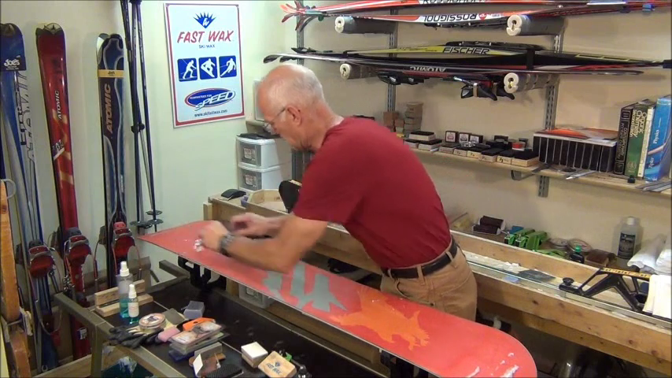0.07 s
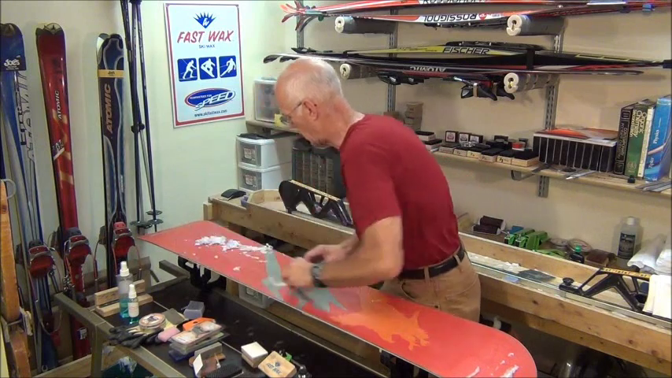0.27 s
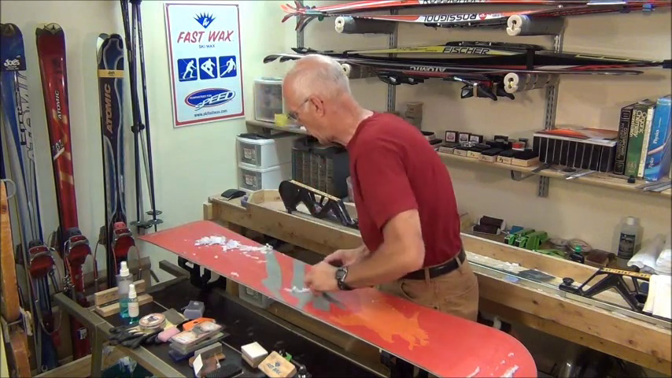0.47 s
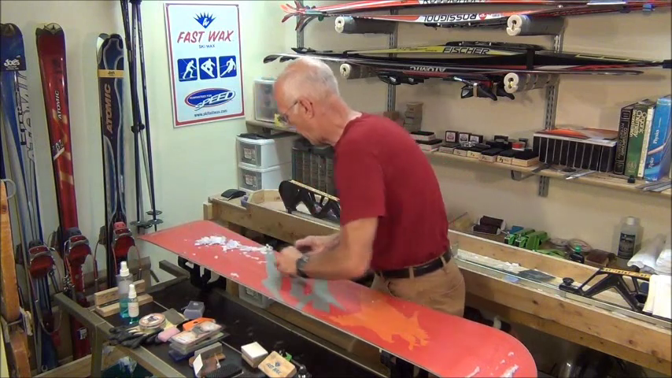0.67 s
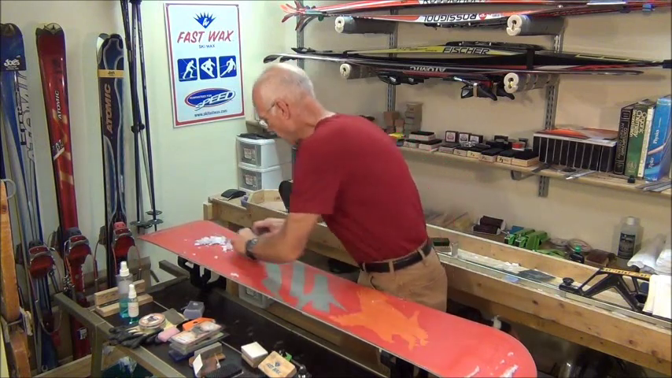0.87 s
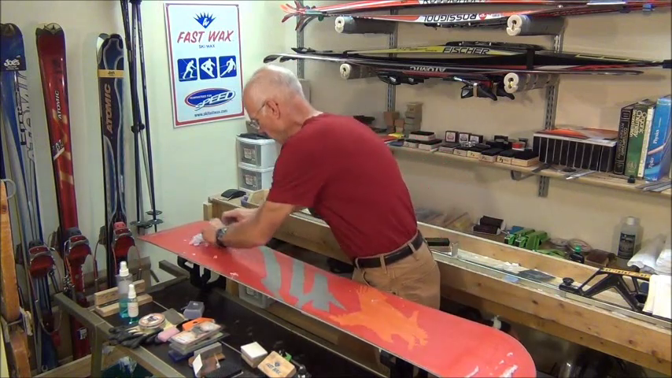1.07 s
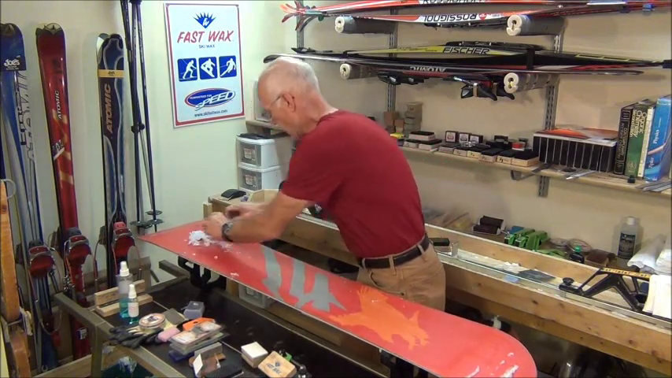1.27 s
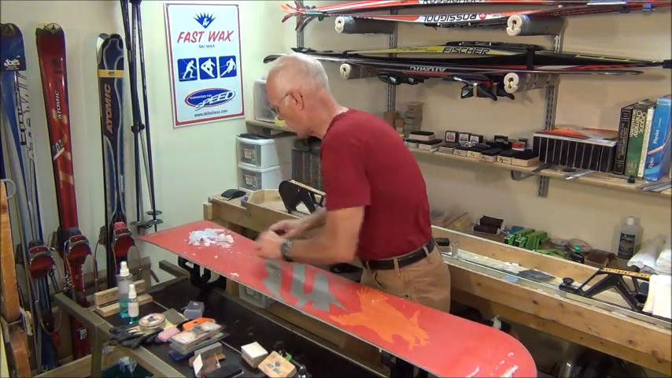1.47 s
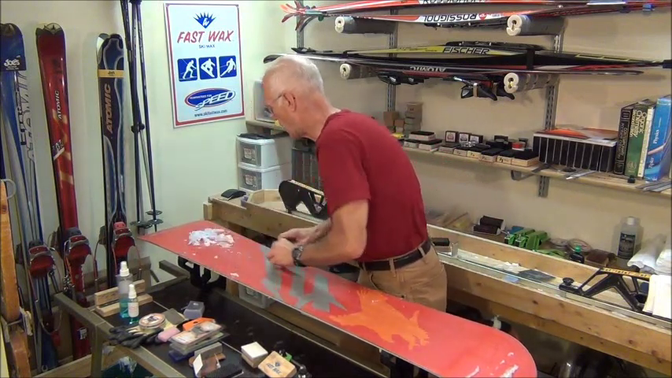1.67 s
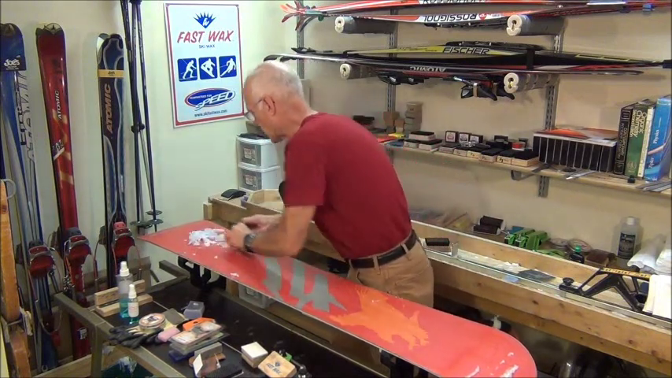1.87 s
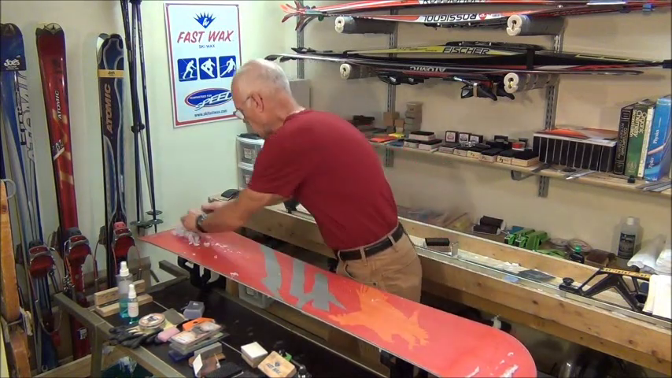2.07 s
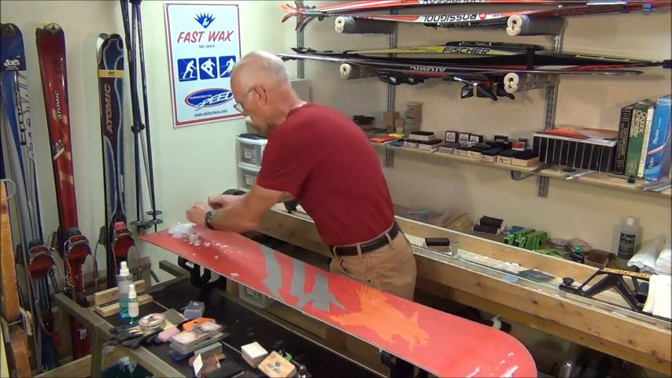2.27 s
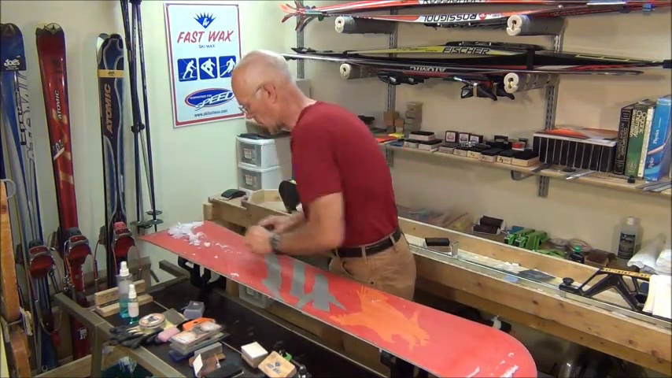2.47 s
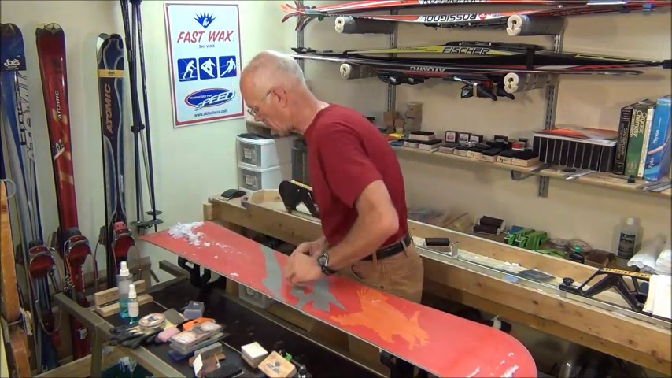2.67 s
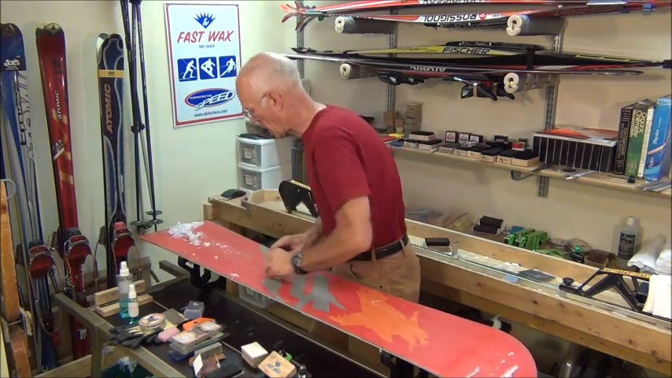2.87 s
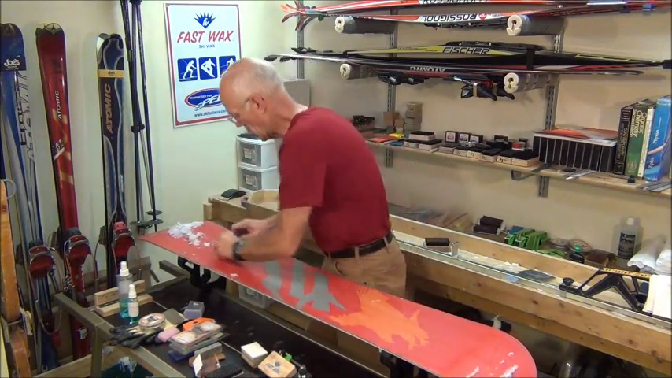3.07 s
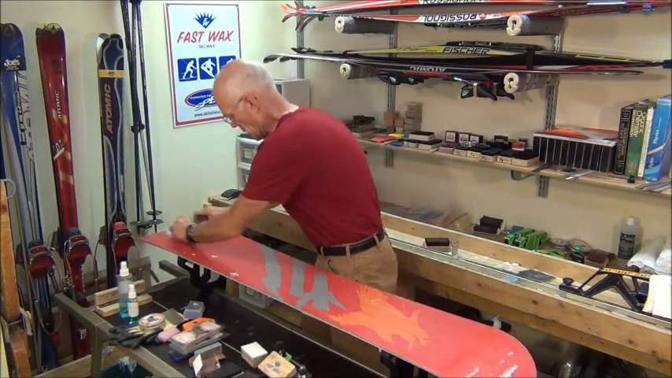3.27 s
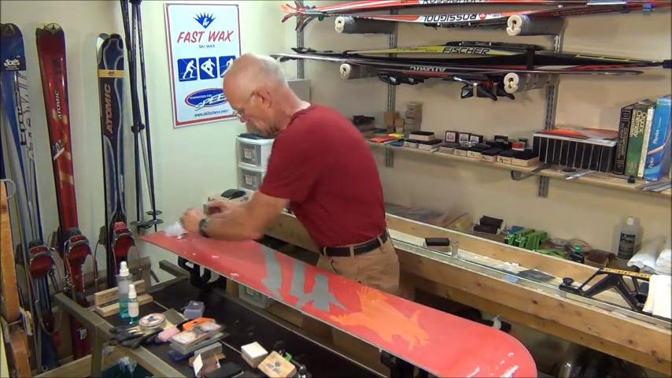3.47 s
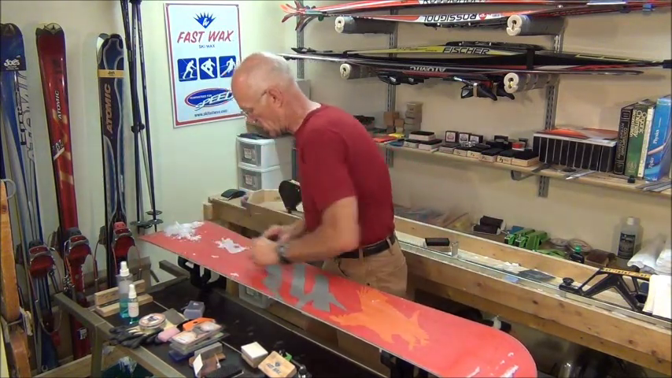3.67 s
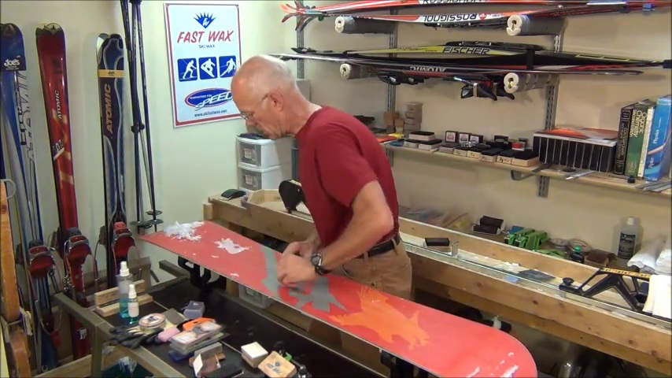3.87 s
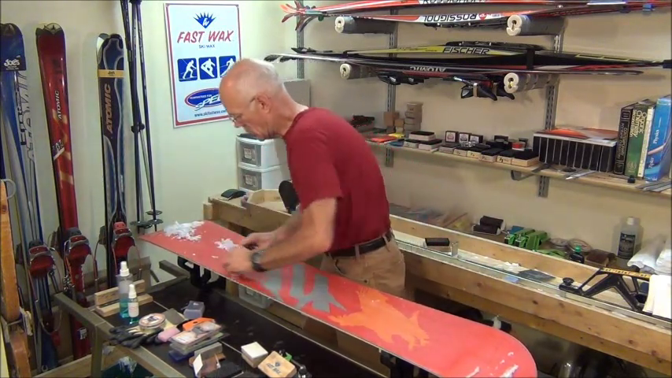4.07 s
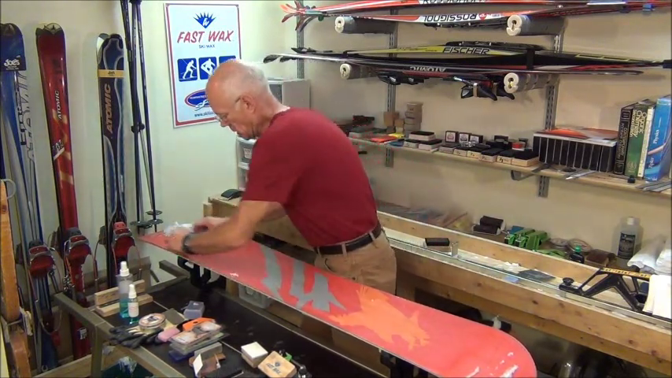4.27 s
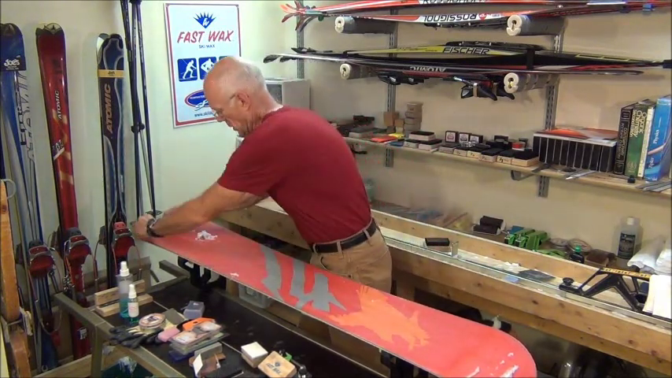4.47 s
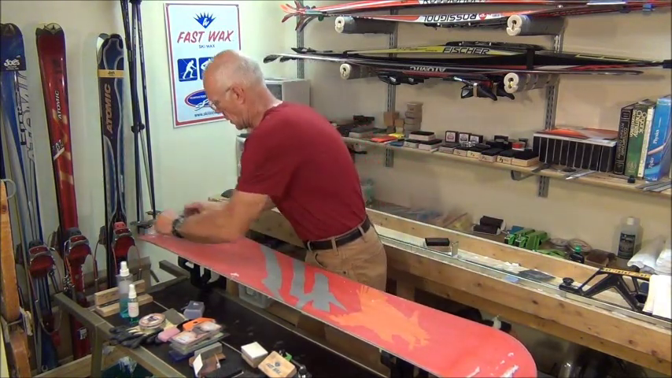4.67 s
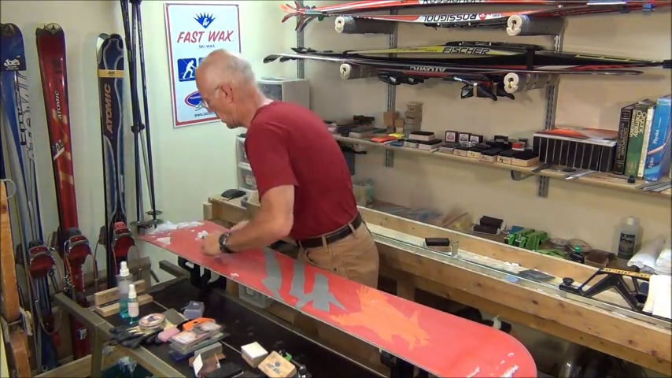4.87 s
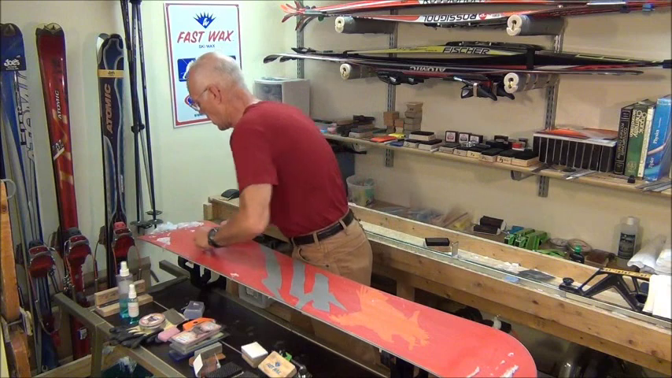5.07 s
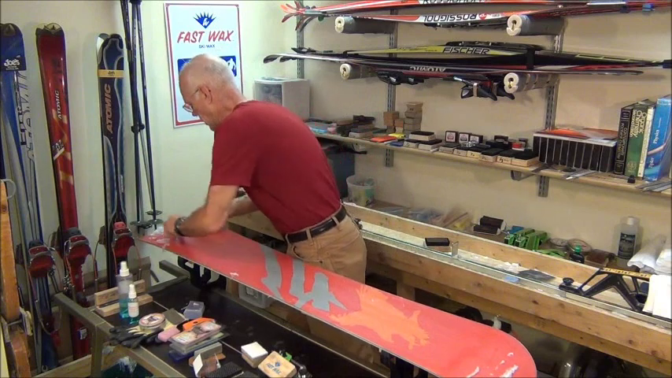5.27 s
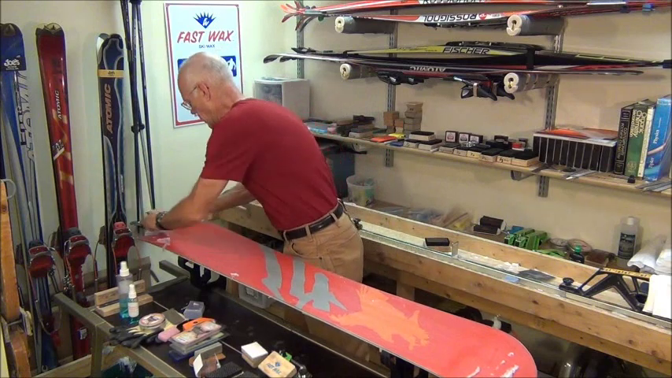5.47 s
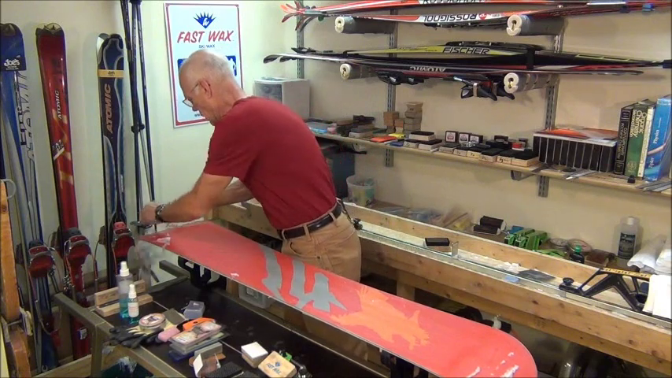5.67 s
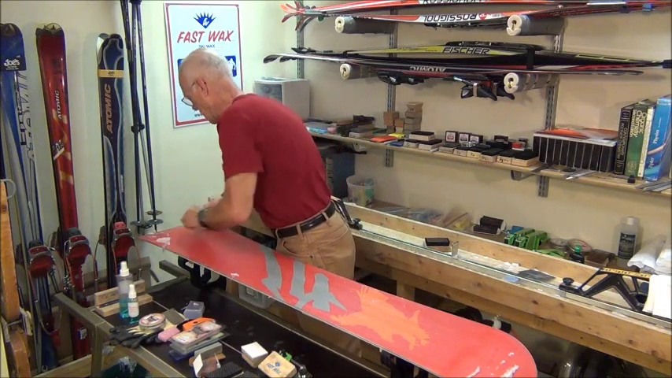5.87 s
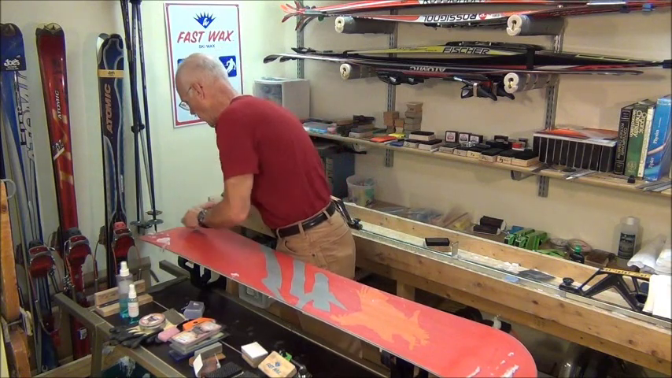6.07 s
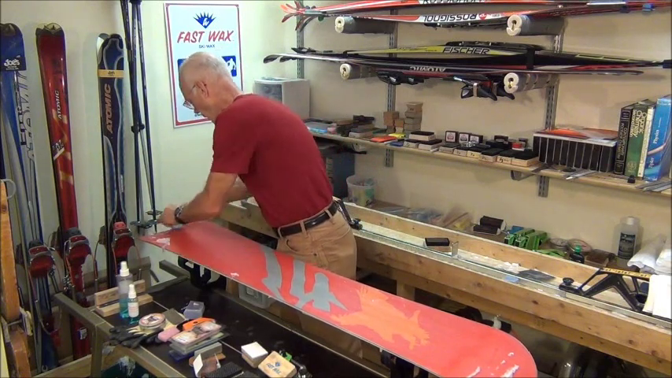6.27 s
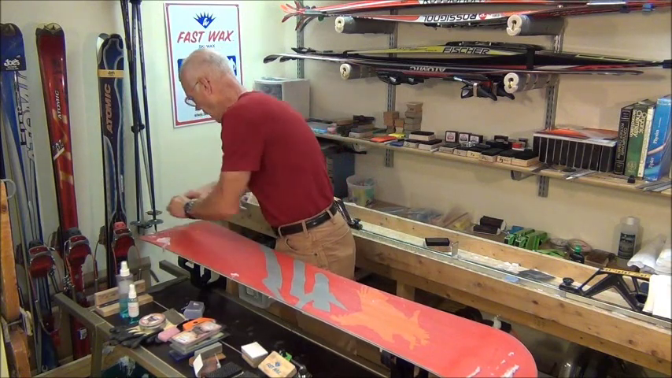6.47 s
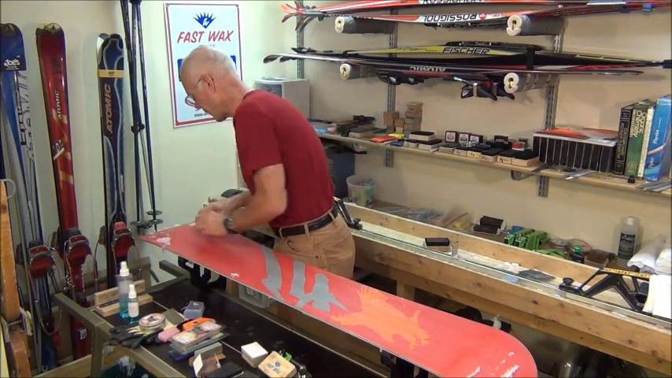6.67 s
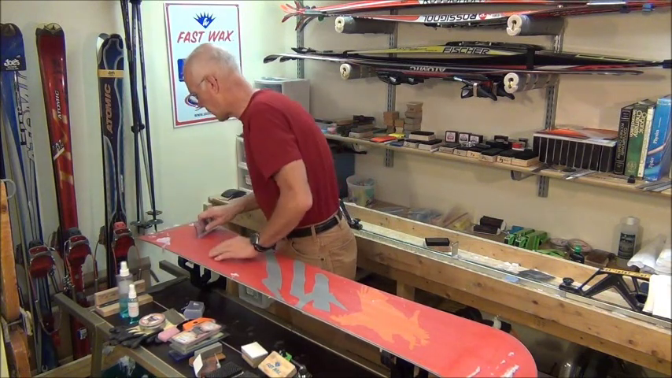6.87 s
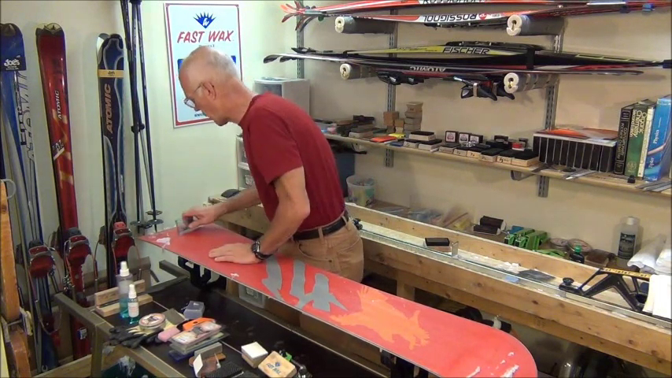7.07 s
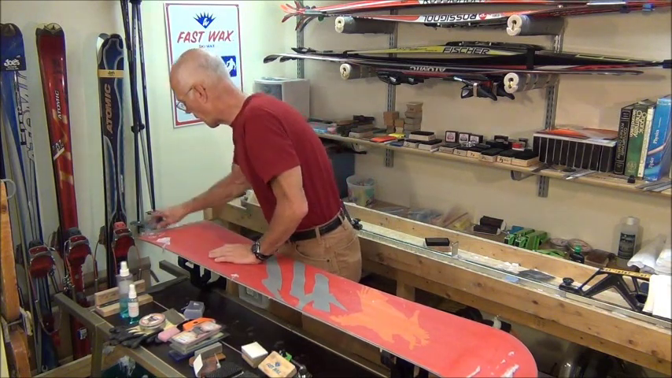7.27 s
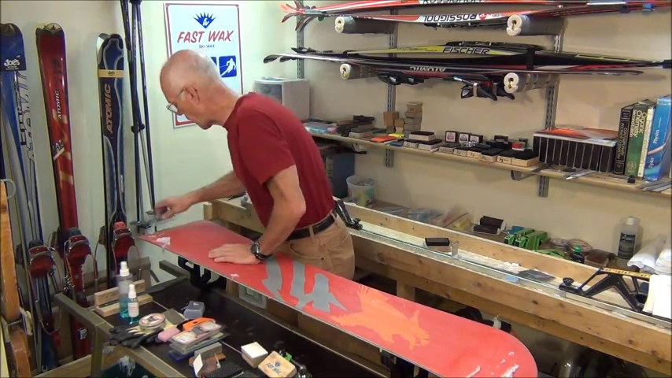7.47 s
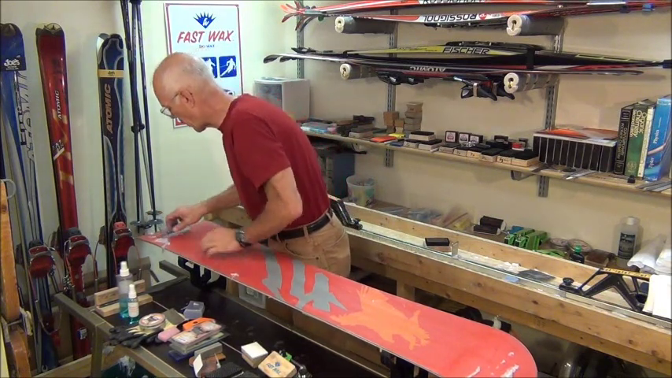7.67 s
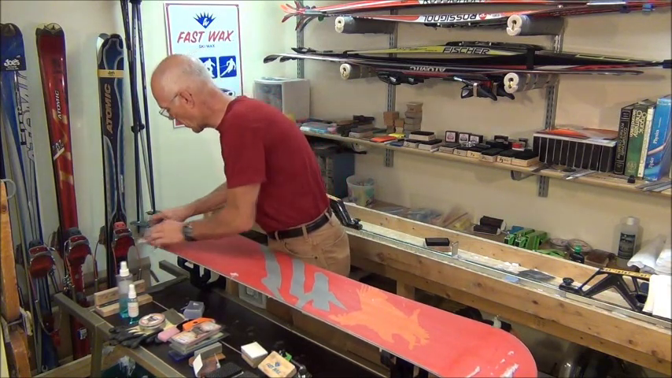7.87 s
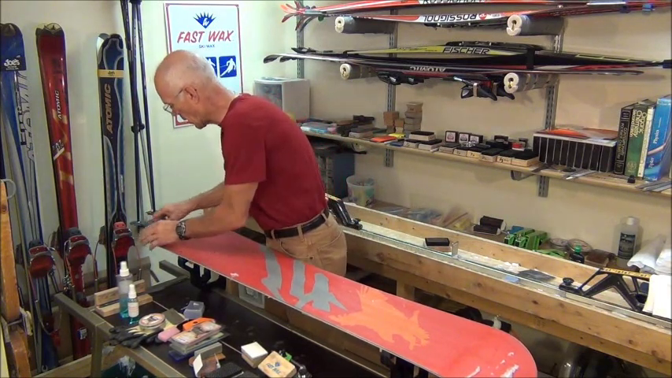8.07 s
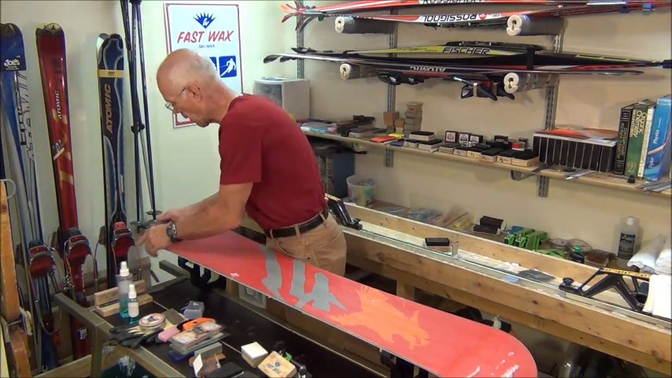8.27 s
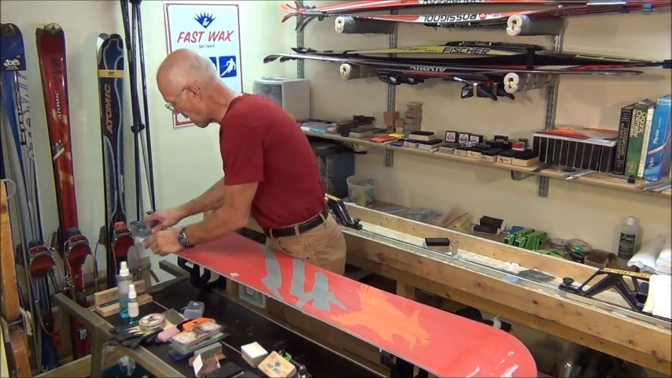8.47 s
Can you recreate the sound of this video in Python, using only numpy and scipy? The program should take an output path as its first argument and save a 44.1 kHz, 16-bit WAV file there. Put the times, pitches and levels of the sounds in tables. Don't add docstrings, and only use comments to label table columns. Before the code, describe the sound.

Close, bright rasping of a hard edge on a waxed board: regular half-second pulls separated by near-quiet gaps with small taps, soft thuds and a brittle wax click. After five pulls the blade bounces woodenly off the end, then brief scrapes and firm knocks come irregularly. The board twangs low; a faint steady hum and tight workshop walls surround it.

```python
import sys
import numpy as np
from scipy import signal
from scipy.fft import rfft, irfft, next_fast_len
from scipy.io import wavfile
from scipy.ndimage import uniform_filter1d

SR = 44100
rng = np.random.default_rng(int(sys.argv[2]) if len(sys.argv) > 2 else 0)


def output_pcm(signal):
    pcm = np.clip(np.atleast_2d(signal).T, -1, 1) * 32767
    wavfile.write(sys.argv[1], SR, np.round(pcm).astype(np.int16))


def rack_gain(trim_db):
    fader = np.asarray(trim_db, float)
    return 10 ** (fader / 20)


N = 375291

# frequency in Hz, density in dB per Hz; then dB rms.
AIR, AIR_DB = [(18, -43), (30, -32), (100, -35), (189, -30), (239, 15), (287, 10), (937, 3.5), (1670, -0.5),
               (2060, 0), (2410, -3.5), (16000, -9)], -51
# frequency in Hz, level in dB rms.
HUM = [(242.2, -56), (554.5, -65), (1437, -71), (1922, -68), (2039, -67.5), (2159, -69), (2283, -71),
       (2519, -89)]
# frequency in Hz, time to fall 60 dB in seconds.
ROOM_T60 = [(100, 0.59), (1000, 0.36), (5000, 0.32), (15000, 0.25)]
# frequency in Hz, side minus mid in dB.
SIDE_DB = [(60, -71), (110, -37), (200, -16), (380, -15.5), (700, -13.5), (1290, -15), (2380, -13),
           (4400, -11), (8120, -11.5), (15000, -13)]
# start in seconds, end in seconds.
NARROW = [(.92, 1.51), (1.88, 2.2), (2.97, 3.43), (3.63, 3.75), (4.17, 4.25), (5.17, 5.45), (8.28, 8.51)]

# frequency in Hz, width in Hz, level in dB.
BENCH = [(85, 9.3, 5.5), (59.4, 12, 1), (125.7, 18.3, 3.5), (146, 17, -4), (205, 34, -12)]
# start in seconds, end in seconds,
# level in dB.
SHOVE = [(0.07, 0.13, -41), (0.27, 0.43, -54), (0.64, 0.74, -40.5), (1.08, 1.11, -40), (1.36, 1.44, -48),
         (1.54, 1.6, -49), (1.72, 1.74, -50), (1.99, 2.06, -44.5), (2.1, 2.16, -43.5), (2.31, 2.38, -41),
         (2.54, 2.68, -45), (2.94, 3.07, -40.5), (3.24, 3.4, -42), (3.78, 3.84, -50), (4.1, 4.15, -69),
         (4.49, 4.51, -47), (4.89, 4.96, -50), (5.25, 5.35, -50), (5.43, 5.44, -32), (5.57, 5.62, -47),
         (5.9, 5.91, -34), (6.01, 6.05, -45), (6.22, 6.36, -46.5), (6.61, 6.62, -33), (6.71, 6.72, -38),
         (6.93, 7.0, -50), (7.145, 7.165, -32.5), (7.3, 7.33, -41), (7.64, 7.74, -47), (7.98, 8.06, -44),
         (8.276, 8.283, -40),
    (8.5, 8.51, -47),
]
# start in seconds, end in seconds, level in dB.
TWANG = [(0.06, 0.13, -47.5), (0.37, 0.43, -39.5), (0.64, 0.73, -36.5), (1.08, 1.1, -38),
         (1.43, 1.44, -43.5), (1.55, 1.59, -37), (1.73, 1.735, -42), (2.0, 2.01, -43), (2.23, 2.24, -43),
         (2.36, 2.37, -39.5), (2.65, 2.68, -32), (2.95, 3.12, -47), (3.3, 3.4, -46), (3.79, 3.83, -39.5),
         (4.87, 4.89, -60), (5.43, 5.56, -37), (5.88, 5.93, -30), (6.24, 6.3, -42.5), (6.6, 6.63, -34.5),
         (6.67, 6.71, -37), (6.8, 6.835, -38.5), (7.16, 7.17, -41), (7.3, 7.33, -38), (7.63, 7.67, -35.5),
         (8.05, 8.07, -45.5), (8.255, 8.29, -23.5), (8.38, 8.42, -41)]
# start in seconds, end in seconds, level in dB.
SWAY = [
    (2.09, 2.18, -36),
    (7.97, 8.0, -33.5),
    (8.02, 8.07, -40),
    (7.15, 7.165, -40),
]
# start in seconds, peak in dB, push in seconds.
THUD = [
    (7.137, -28, 0.0038),
    (7.162, -18, .006),
    (6.612, -26, .004),
]
# start in seconds, peak in dB.
SNAP = [
    (3.6208, -18),
    (3.6226, -18),
    (3.6265, -29),
    (3.632, -25),
    (2.3462, -31),
    (2.5285, -38),
]

# frequency in Hz, width in Hz, level in dB.
BOARD = [(270, 38, -25), (389, 12, 6.5), (449, 43, 9.5), (597, 42, 5), (635, 170, -1.5), (760, 130, -16),
         (778, 52, -0.5), (870, 70, -10.5), (1060, 50, -11), (1230, 140, -6.5), (1188, 86, 0.5),
         (1435, 190, -23.5), (1490, 60, -5), (1480, 42, -15), (1620, 24, -17), (1880, 150, -50),
         (2010, 110, -18), (2030, 130, -10), (2350, 64, -15), (2550, 96, -5), (2950, 76, 0),
         (2880, 100, -31), (3010, 130, -31)]
# lower edge in Hz, upper edge in Hz.
GROUPS = [(210, 760), (720, 1680), (1600, 3100)]
# time in seconds, middle modes in dB,
# low modes in relative dB, high modes in relative dB, favoured mode in Hz.
SET_DOWN = [(0.354, -39, -3, -12, 770), (0.366, -36.5, 1.5, -2.5, 676), (0.396, -39.5, -9, -13, 595),
            (1.5155, -21, -12, -1.5, 1415), (1.535, -28.5, -2, -1, 1510), (2.626, -25, -6, -1.5, 1050),
            (2.636, -25, 2, -3, 573), (3.7575, -32.5, -1, -16, 1053), (4.865, -30.5, -2.5, -6, 930),
            (4.9, -40, 4, -4, 457), (5.864, -34, 4.5, -4.5, 760), (5.92, -46, 13, -8, 455),
            (6.659, -31, -3, -6, 850), (7.614, -32, -3, -10, 800), (8.234, -18, -14, -1.5, 1190),
            (8.27, -26.5, 4.5, -16, 570)]
# time in seconds, middle modes in dB,
# low modes in relative dB, high modes in relative dB, favoured mode in Hz.
BOUNCE = [(5.379, -30, -6, 4, 736), (5.427, -19.5, -18, 1.5, 770), (5.453, -20, -6.5, -8, 1006),
          (5.49, -29, -10, 9, 1460), (7.138, -41, 4, -15, 620), (7.168, -22, -18, -2, 824),
          (7.197, -17.5, -34, -9, 1060), (7.211, -21, -12, -6, 1326), (7.228, -19, -25, -12, 1075),
          (7.265, -28, -17, 4, 840), (7.285, -36, -15, -9, 1180)]
# time in seconds, middle modes in dB,
# low modes in relative dB, high modes in relative dB, favoured mode in Hz.
TAP = [(0.045, -52, 8, -2, 383), (0.09, -44.5, -9, -1, 475), (1.069, -47, 14.5, -10, 436),
       (1.303, -59, -3, -6, 900), (1.42, -81, 13, 2, 296), (2.207, -40, -1, -10, 1350),
       (2.295, -53, 5, -8, 400), (2.346, -42.5, 4, -1, 585), (2.528, -53, 5, 2, 895),
       (3.0, -42, 2.5, -9, 590), (3.169, -37, -10, -5, 647), (3.31, -37, -1, 0.5, 800),
       (3.466, -43, -5, -4.5, 1497), (4.48, -44.5, -4, -23, 760), (6.25, -32, -8, -9, 953),
       (6.592, -45, 8, -6, 300), (6.607, -41.5, 4, -10, 786), (6.765, -42, 5, -8, 410),
       (6.8, -43.5, -12, -6, 407), (7.509, -51, 5.5, -7, 595), (7.66, -38.5, -2, -6, 435)]
# time in seconds, middle modes
# in dB, # low modes in relative dB, high modes in relative dB, favoured mode in Hz.
FURTHER_BLOWS = [(0.378, -37.5, 1, -18, 700), (1.528, -27, -4, -5, 1300), (1.563, -31, -4, -15, 870),
                 (2.218, -42.5, -3, -7, 1690), (2.245, -50, 0, -10, 1320), (2.358, -43.5, 2, -8, 950),
                 (3.479, -49, 2, -12, 467), (3.506, -49.5, -8, -10, 1560), (3.766, -32.5, 1, -18, 780),
                 (3.81, -37, -1, -18, 767), (5.435, -24, -12, -2, 1260), (5.885, -37.5, 5, -15, 646),
                 (7.175, -25, -11, -3, 1450), (7.315, -33, -15, -12, 1140), (7.345, -38, -15, -12, 1230),
                 (7.98, -56, -1, -15, 800), (8.025, -57, -1, -15.5, 800), (8.09, -61, 0, -15, 600),
                 (8.19, -62, -5, -15, 900), (8.25, -26, -6, -2, 1700), (8.29, -30, -4, -6, 1150),
                 (5.47, -24, -9, -4, 1300), (5.515, -30, -8, -2, 1500), (1.545, -30.5, -5, -8, 1520),
                 (7.253, -25, -12, -6, 900), (6.675, -40.5, 4, -13, 620), (2.375, -46.5, 5, -10, 800)]

# frequency in Hz, density in dB per Hz.
EDGE = [(2060, -63.5), (3500, -10.5), (4300, -6.5), (5050, 0.5), (5720, -2), (7720, -1), (9660, 2),
        (12100, -9), (14600, -17), (15500, -18.5)]
# frequency in Hz, density in dB per Hz.
BODY = [(410, -16.5), (700, -6), (1530, -1), (1640, -2.5), (2100, -2.5), (2700, 2), (4300, -4.5),
        (5060, -11.5), (6000, -3.5), (7800, -16), (13200, -120)]
# frequency in Hz, width in Hz, level in dB.
BLADE = [(2040, 660, -7.5), (3420, 560, -10.5), (4840, 1600, -8), (2180, 33, -36)]
# edge bites in seconds, edge lifts in seconds, hiss at the bite in dB,
# hiss at the lift in dB, blade body in relative dB.
PULL = [(0.501, 1.04, -17, -20, -6.5), (1.659, 2.039, -19.5, -20.5, -3.5), (2.769, 3.232, -18.5, -20, -7.5),
        (3.883, 4.379, -18, -17, -9), (4.97, 5.355, -19, -17.5, -8), (5.41, 5.482, -41.5, -29.5, 13),
        (6.01, 6.212, -28.5, -16.5, -3.5), (6.255, 6.244, -26, -26, 4), (6.933, 7.03, -33, -31, 3),
        (7.068, 7.117, -23.5, -21, -0.5), (7.213, 7.25, -31.5, -24, 6), (7.77, 7.78, -33, -27.5, 0.5),
        (8.367, 8.352, -17.5, -26.5, -5.5)]
# start in seconds, end in seconds, hiss at the start in dB,
# hiss at the end in dB, blade body in relative dB.
TOUCH = [(0.01, 0.084, -55.5, -47.5, 3), (0.177, 0.41, -58.5, -51.5, 1.5), (1.56, 1.5, -57, -58, 16),
         (2.244, 2.3, -53, -51, -1), (2.348, 2.354, -34.5, -51, 8), (2.527, 2.62, -45, -61, 0),
         (2.627, 2.68, -32, -54, 4), (3.41, 3.6, -61, -51, -5), (3.64, 3.6, -40, -54, -18),
         (3.757, 3.8, -34.5, -36, 2.5), (5.75, 5.843, -57, -57, -1), (5.864, 5.88, -33, -31, 1),
         (5.915, 5.992, -31, -43, -11), (6.6, 6.64, -62, -54, 6), (6.782, 6.891, -57, -33, 4),
         (7.633, 7.757, -57, -36.5, 10.5), (7.943, 8.14, -46, -72, -3), (8.236, 8.24, -39.5, -42.5, 18)]
# middle in seconds, half length in seconds, body gain in dB.
FLEX = [
    (0.9, .08, -0.5),
    (1.927, .06, 1),
    (2.05, 0.069, -3.5),
    (3.076, .06, 2),
    (3.2, 0.03, -1.5),
    (4.08, 0.11, -2),
    (4.336, 0.052, 1.5),
    (5.304, 0.098, 1.5),
]
# start in seconds, end in seconds, level in dB,
# frequency in Hz, width in Hz.
SING = [(0.8, 0.96, -30, 5000, 450), (2.1, 2.05, -31, 7550, 400), (2.76, 2.7, -32, 4700, 450),
        (3.94, 3.91, -28, 5150, 500), (4, 4.42, -34, 5100, 450), (4.33, 4.4, -31.5, 3300, 900),
        (5.262, 5.278, -23.5, 4870, 350), (5.2, 5.1, -29, 5800, 500), (4.95, 5.1, -37, 2250, 180),
        (4.88, 4.97, -40, 456, 50), (1.9, 1.98, -31.5, 2700, 900), (7.29, 7.35, -40, 1220, 200),
        (3.478, 3.5, -46, 473, 60), (2.635, 2.685, -29, 480, 150), (7.2, 7.245, -26, 1100, 120)]

SWAY_HZ, TIP_HZ = 84, 294.2
SHOVE_DB_PER_S, SETTLE_DB_PER_S, BENCH_REST_DB = 450, 160, -56.5
TWANG_DB_PER_S, FADE_DB_PER_S, TIP_REST_DB = 900, 210, -63.5

CHATTER_S = 0.012
CRACK_DB, CRACK_PER_DB = -44.5, 0.87
FAVOUR_DB, FAVOUR_WIDTH_HZ = -2.5, 67
LOW_LATE_S, HIGH_FADE_S = 0.003, 0.025
REACH = 1.73
KNOCK_ROOM_DB = -1.5

BITE_DB_PER_S, TOUCH_DB_PER_S, LIFT_DB_PER_S = 577, 3000, 310
ROUND_S = 0.03
DIG_DB, DIG_S = 0.5, 0.055
BODY_START_DB, BODY_START_S = 3, 0.025
BODY_END_DB = 6.5
SLOW_BODY, SLOW_BODY_TOP_DB = 0.34, 3
EARLY_BODY, EARLY_BODY_TOP_DB = 0.63, 13.5
RUMBLE_DB, RUMBLE_END_DB, TOUCH_RUMBLE_DB = -32, 15.5, -14
RUMBLE_LINGER = 0.51
KEEN_DB, KEEN_REST_DB = 5.5, 6.5
SING_DB_PER_S = 500

LEFT_DB = 0.4
GAIN_KNEE_DB, GAIN_SLOPE, GAIN_S = -30, 0.2, 0.23
TOP_HZ, NARROW_HZ = 15680, 4650


def level(x, db):
    return x * rack_gain(db) / np.sqrt(np.mean(x ** 2))


def colour(x, points):
    hz, db = np.transpose(points)
    n = x.shape[-1]
    size = next_fast_len(n)
    f = np.maximum(np.arange(size // 2 + 1) * SR / size, 1)
    gain = rack_gain(np.interp(np.log(f), np.log(hz), db))
    return irfft(rfft(x, size) * gain, size)[..., :n]


def ring(x, hz, width):
    return signal.lfilter(*signal.iirpeak(hz, hz / max(width, 3), fs=SR), x)


def walk(rate):
    k = int(SR / rate)
    steps = np.repeat(rng.standard_normal(N // k + 1), k)
    return 1.3 * uniform_filter1d(uniform_filter1d(steps, k), k)[:N]


def steady(x, s):
    power = uniform_filter1d(x ** 2, int(s * SR))
    return level(x / np.sqrt(power + 0.28 * np.mean(x ** 2)), 0)


def curves(start, end, rise, fall, round_s=0):
    t = np.arange(N) / SR
    away = rise * np.maximum(start - t, 0) + fall * np.maximum(t - end, 0)
    soft = round_s * np.where(t < start, rise, fall)
    along = np.clip((t - start) / max(end - start, .001), 0, 1)
    return along, np.hypot(away, soft) - soft


def swells(rows, rise, fall, rest_db):
    power = sum(rack_gain(db - curves(a, b, rise, fall)[1]) ** 2 for a, b, db in rows)
    return np.sqrt(rack_gain(rest_db) ** 2 + power)


def shop():
    t = np.arange(N) / SR
    hum = 0
    for f, db in HUM:
        hum = hum + rack_gain(db + 2.5 + 0.5 * walk(28)) * np.sin(2 * np.pi * (f * t + rng.random()))
    air = level(colour(rng.standard_normal((2, N)), AIR), AIR_DB) * rack_gain(walk(2.72))
    return air[0] + hum, air[1] * rack_gain(7.5)


def room(x, count=10):
    t = np.arange(int(.7 * SR)) / SR
    hz, t60 = np.transpose(ROOM_T60)
    echo = 0
    for f in 60 * 2. ** np.arange(9):
        band = ring(rng.standard_normal((count, 2, len(t))), f, 0.65 * f)
        decay_s = np.interp(np.log(f), np.log(hz), t60)
        echo = echo + band * np.exp(-np.log(1000) * t / decay_s)
    echo = echo * np.clip(t / 0.00079 - .3, 0, 1)
    echo /= np.sqrt(np.sum(echo ** 2, axis=2, keepdims=True))
    place = np.arange(N) / SR * 57 % count
    wet = 0
    for k in range(count):
        distance = np.abs((place - k + count / 2) % count - count / 2)
        share = np.cos(np.pi / 2 * np.clip(distance, 0, 1))
        wet = wet + signal.fftconvolve((x * share)[None], echo[k], axes=1)[:, :N]
    return wet


def thumps():
    shove = swells(SHOVE, SHOVE_DB_PER_S, SETTLE_DB_PER_S, BENCH_REST_DB)
    twang = swells(TWANG, TWANG_DB_PER_S, FADE_DB_PER_S, TIP_REST_DB)
    drive = rng.standard_normal((2, N))
    bench = sum(level(ring(ring(drive[0], f, 2 * w), f, w), db) for f, w, db in BENCH)
    tip = level(ring(ring(drive[1], TIP_HZ, 35), TIP_HZ, 14.5), 0)
    tip += level(ring(ring(drive[1], 228, 53), 228, 35), -11.0)
    note = np.sqrt(2) * np.sin(2 * np.pi * SWAY_HZ * np.arange(N) / SR)
    sway = swells(SWAY, 900, 300, -90) * note
    return sway + shove * steady(bench, 0.13) + twang * rack_gain(1.0) * steady(tip, 0.086)


def thuds():
    t = np.arange(N) / SR
    out = np.zeros(N)
    for s, db, push in THUD:
        swing = np.sin(np.pi * np.clip((t - s) / push, 0, 2))
        out -= rack_gain(db) * swing * np.exp(-np.maximum(t - s, 0) / (2 * push))
    return out


def snaps():
    out, t = np.zeros(N), np.arange(SR // 200) / SR
    for s, db in SNAP:
        burst = rng.standard_normal(len(t)) * np.exp(-t / .0003)
        click = ring(ring(burst, 10500, 9000), 10500, 12000)
        i = int(s * SR)
        out[i:i + len(t)] += rack_gain(db) * click / np.abs(click).max()
    return out


def knocks():
    out, t = np.zeros(N + SR), np.arange(SR // 3) / SR
    onset = SR // 30
    late = 1 - np.exp(-t / LOW_LATE_S)
    fade = np.exp(-t / HIGH_FADE_S)
    for s, db, low_db, high_db, hz in sorted(SET_DOWN + BOUNCE + TAP) + FURTHER_BLOWS:
        place = rack_gain(2 * rng.standard_normal(len(BOARD)))
        blow = np.exp(-t / CHATTER_S) * rng.standard_normal(len(t))
        blow[0] += 9.0
        modes = 0.23 * blow
        for (f, w, g), p in zip(BOARD, place):
            modes = modes + p * rack_gain(g) * ring(blow, f, 2.0 * w)
        favoured = ring(ring(blow, hz, 4 * FAVOUR_WIDTH_HZ), hz, FAVOUR_WIDTH_HZ)
        hit = rack_gain(FAVOUR_DB) * favoured / np.sqrt(np.mean(favoured[:onset] ** 2))
        crack_db = CRACK_DB + CRACK_PER_DB * (db + 27) - db
        crack = ring(rng.standard_normal(len(t)), 4100, 7500) * np.exp(-t / (0.54 * CHATTER_S))
        hit += rack_gain(crack_db + 15.0) * crack
        low, middle, high = GROUPS
        middle = (middle[0], np.clip(REACH * hz, 1400, middle[1]))
        shares = (rack_gain(low_db) * late, -1, rack_gain(high_db + 2.5) * fade)
        for edges, share in zip((low, middle, high), shares):
            group = signal.sosfilt(signal.butter(2, edges, "band", fs=SR, output="sos"), modes)
            hit += share * group / np.sqrt(np.mean(group[:onset] ** 2))
        i = int((s - .0007) * SR)
        out[i:i + len(t)] += rack_gain(db - 1.5) * hit
    return out[:N]


def hands():
    power, keen_db = np.zeros((3, N)), KEEN_REST_DB
    for a, b, from_db, to_db, body_db in PULL:
        along, lost_db = curves(a, b - ROUND_S / 2, BITE_DB_PER_S, LIFT_DB_PER_S, ROUND_S)
        pulled_s = along * (b - a)
        far = along * min((b - a) / .5, 1)
        slow_db = np.minimum(SLOW_BODY * lost_db, SLOW_BODY_TOP_DB)
        early_db = np.minimum(EARLY_BODY * lost_db, EARLY_BODY_TOP_DB)
        body_db = body_db + BODY_START_DB * np.exp(-pulled_s / BODY_START_S) + BODY_END_DB * far ** 2
        body_db = body_db + np.where(along > 0, slow_db, early_db)
        rumble_db = RUMBLE_DB + RUMBLE_END_DB * far + RUMBLE_LINGER * along * np.minimum(lost_db, 30)
        hiss_db = from_db + (to_db - from_db) * along - lost_db
        hiss_db = hiss_db + 2.0 + DIG_DB * np.exp(-pulled_s / DIG_S)
        power = power + rack_gain(hiss_db + np.array([np.zeros(N), body_db, rumble_db])) ** 2
        keen_db = keen_db + KEEN_DB * np.sin(np.pi * along)
    for a, b, from_db, to_db, body_db in TOUCH:
        along, lost_db = curves(a, b, TOUCH_DB_PER_S, LIFT_DB_PER_S)
        hiss_db = from_db + (to_db - from_db) * along - lost_db
        power = power + rack_gain(hiss_db + np.array([[0], [body_db], [TOUCH_RUMBLE_DB]])) ** 2
    return *np.sqrt(power), keen_db


def slips(spread_db):
    return rng.standard_normal(N) * rack_gain(spread_db * rng.exponential(1, N))


def singing():
    drive = slips(1.0)
    song = np.zeros(N)
    for a, b, db, hz, width in SING:
        lost_db = curves(a, b, SING_DB_PER_S, SING_DB_PER_S)[1]
        song += rack_gain(db - lost_db) * level(ring(drive, hz, width), 0)
    return song


def scrape():
    edge_gain, body_gain, board_gain, bite_db = hands()
    t = np.arange(N) / SR
    wax_db = walk(25)
    hiss = level(colour(slips(0.96), EDGE), 0) * rack_gain(wax_db + 0.46 * walk(60))
    hiss += (rack_gain(bite_db) - 1) * colour(hiss, [(8500, -25), (12000, 1.5)])
    drive = slips(1.0)
    body = level(colour(drive, BODY), 0)
    body = body + sum(level(ring(drive, f, w), db) for f, w, db in BLADE)
    flex_db = sum(db * np.exp(-((t - s) / half) ** 2) for s, half, db in FLEX)
    body = body_gain * rack_gain(flex_db + wax_db) * level(body, 0)
    drive = slips(2.5)
    board = sum(rack_gain(db) * ring(drive, f, 1.17 * w) for f, w, db in BOARD)
    board = board_gain * rack_gain(1.8 * walk(30)) * level(board, 0)
    return singing() + rack_gain(-5.5) * (edge_gain * hiss + body + board)


def scene():
    rub, blows = scrape(), knocks() + snaps()
    wet = room(rub + rack_gain(KNOCK_ROOM_DB) * blows)
    floor = shop()
    low = thumps() + thuds()
    mid = rub + blows + wet[0] + floor[0] + low
    side = colour(rack_gain(6.0) * wet[1] + floor[1] + low * rack_gain(2 * walk(5.95)), SIDE_DB)
    return np.array([(mid + side) * rack_gain(LEFT_DB), (mid - side) * rack_gain(-LEFT_DB)])


def top_cut(x):
    return signal.sosfilt(signal.butter(12, 16980, fs=SR, output="sos"), x)


def record(dry):
    keep = np.exp(-1 / (GAIN_S * SR))
    loud = signal.lfilter([1 - keep], [1, -keep], np.mean(dry ** 2, axis=0)) / rack_gain(GAIN_KNEE_DB) ** 2
    x = np.tanh(1.129 * dry * (1 + loud) ** (-GAIN_SLOPE / 2)) / 1.029
    x = signal.sosfilt(signal.butter(2, 42, "high", fs=SR, output="sos"), x)
    x = signal.sosfilt(signal.ellip(10, .2, 80, TOP_HZ, fs=SR, output="sos"), x)
    t = np.arange(N) / SR
    narrow = uniform_filter1d(sum(1. * ((t > a) & (t < b)) for a, b in NARROW), size=1024)
    lost = narrow * colour((x[0] - x[1]) / 2, [(NARROW_HZ - 40, -90), (NARROW_HZ, 0)])
    mix = x - np.array([lost, -lost])
    return top_cut(mix)


dry = scene()
out = record(dry)
output_pcm(out)
```